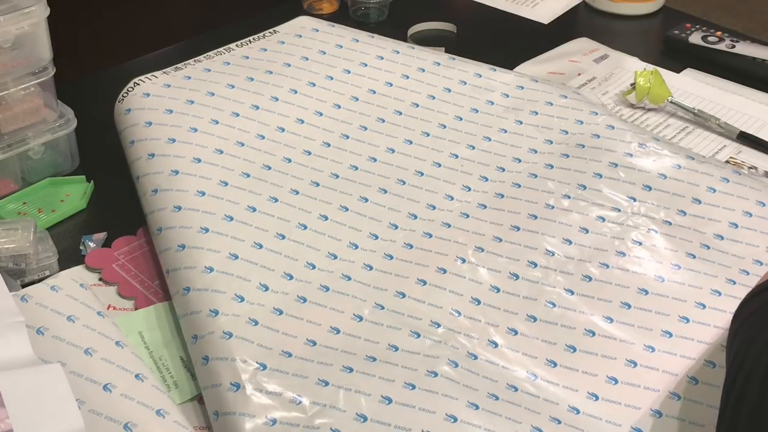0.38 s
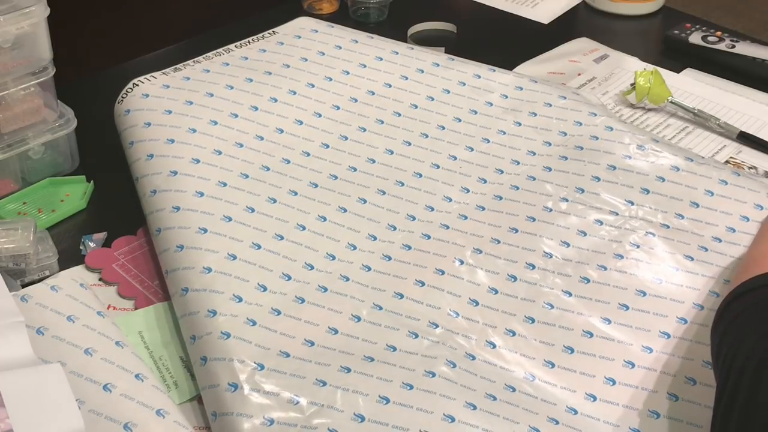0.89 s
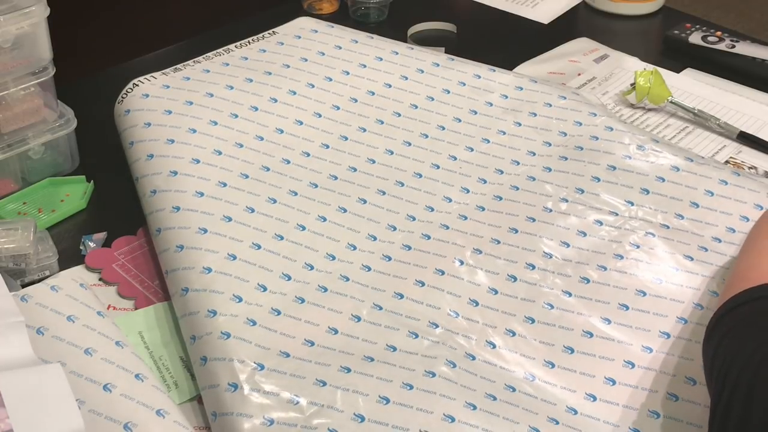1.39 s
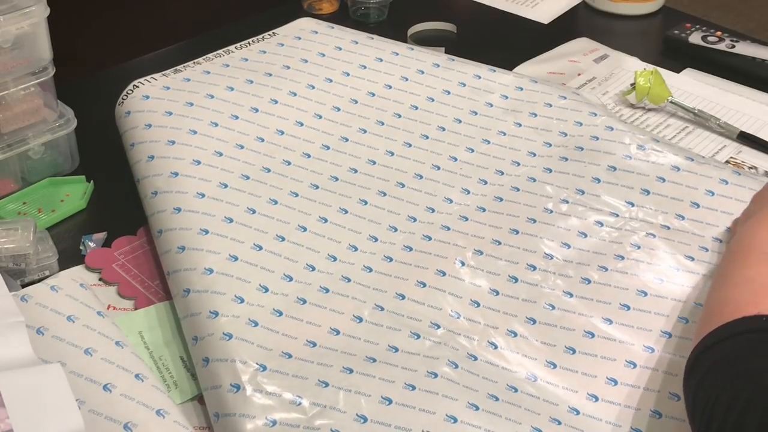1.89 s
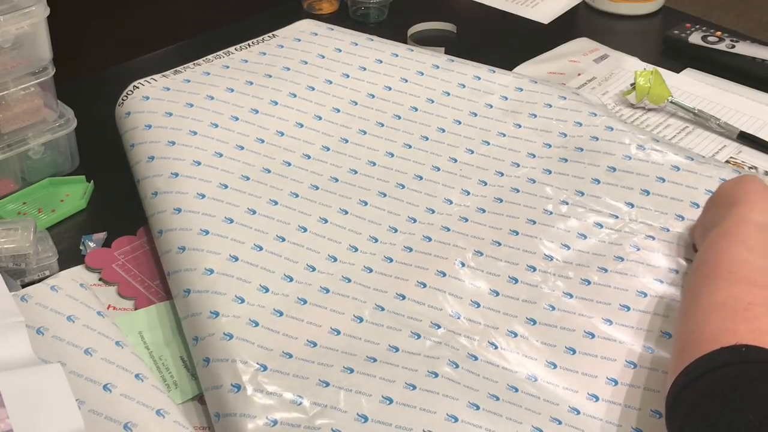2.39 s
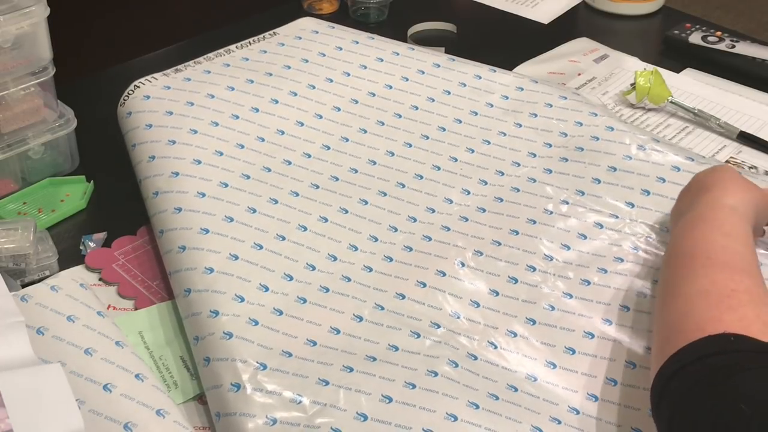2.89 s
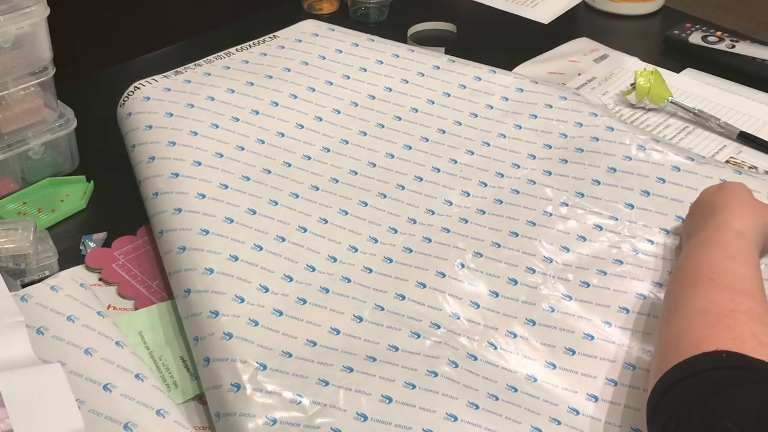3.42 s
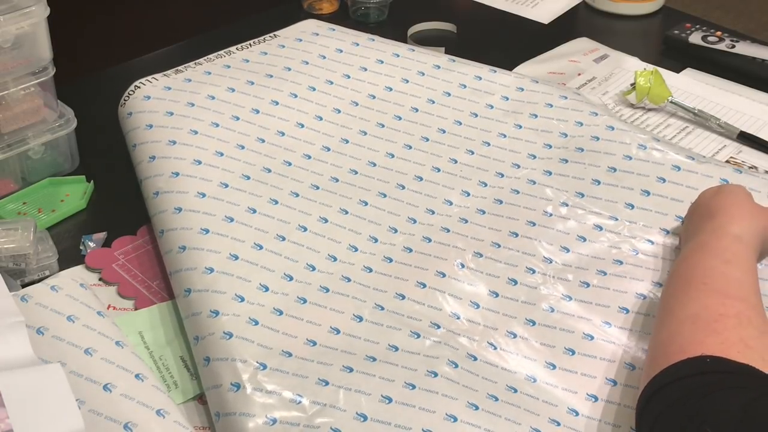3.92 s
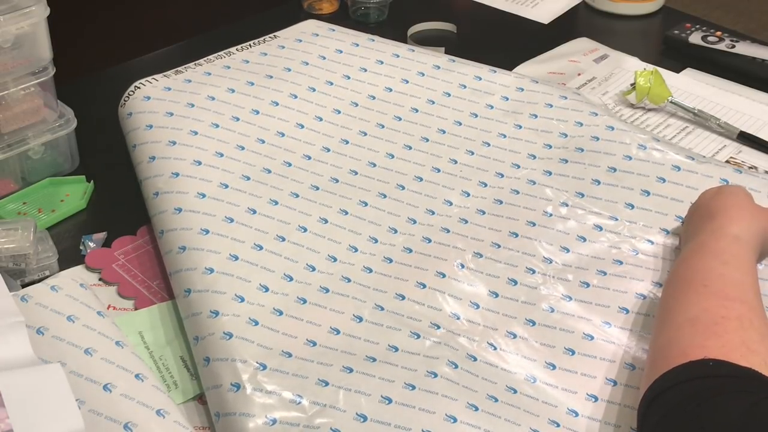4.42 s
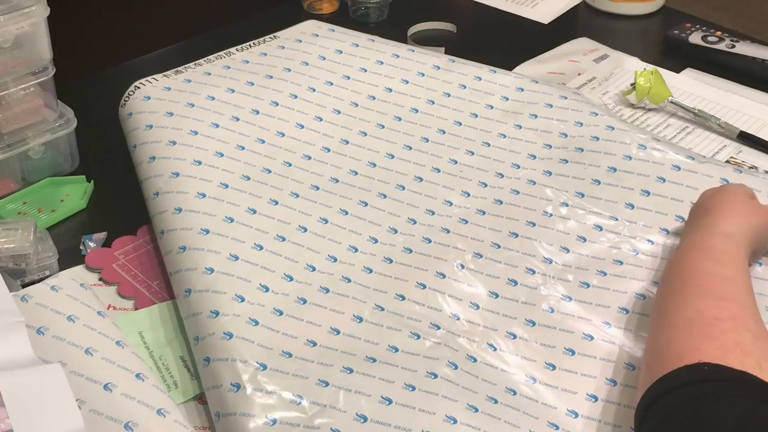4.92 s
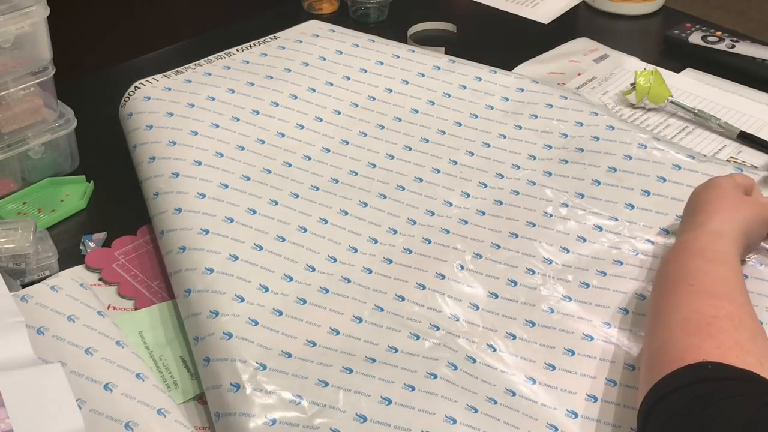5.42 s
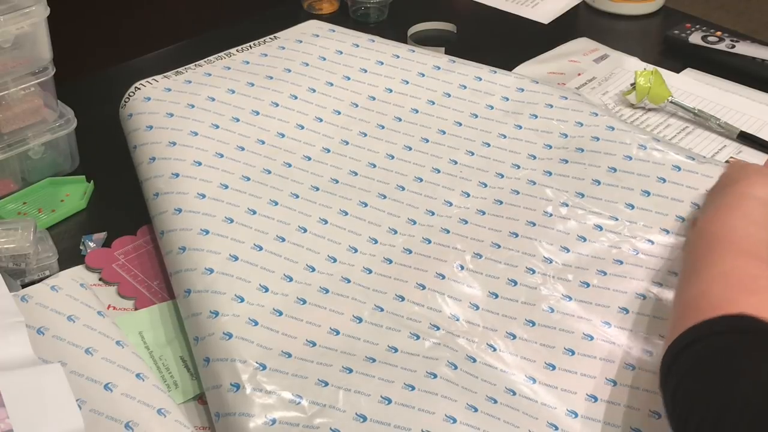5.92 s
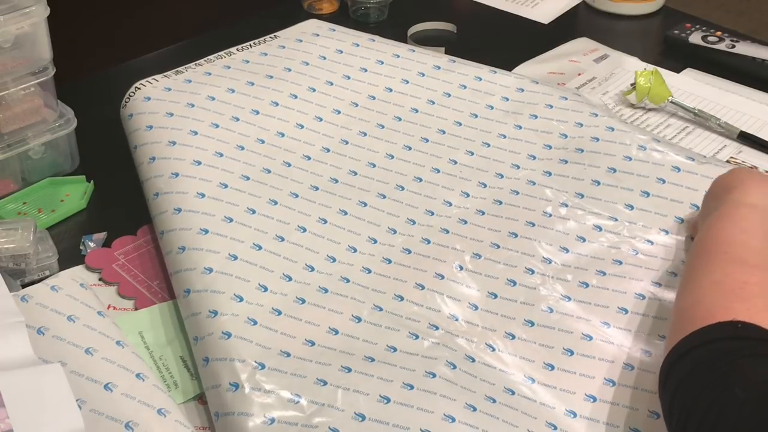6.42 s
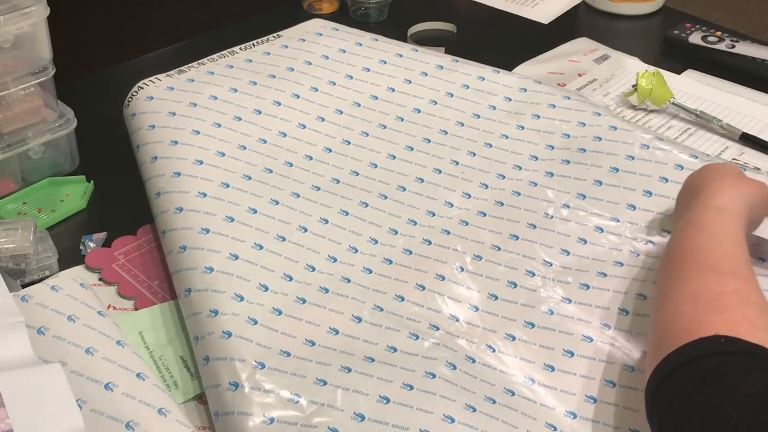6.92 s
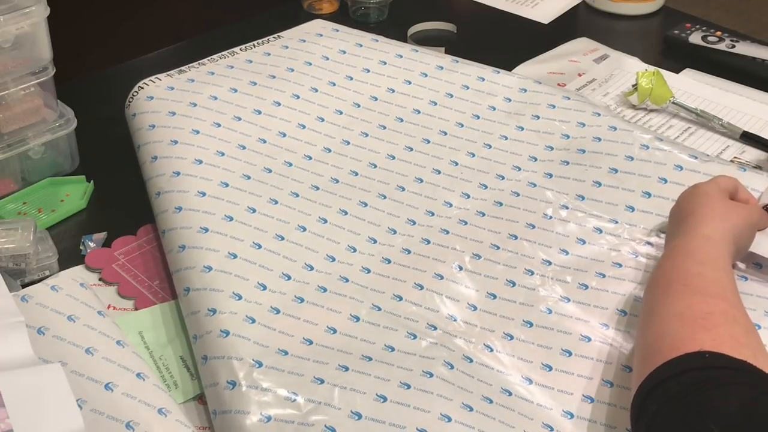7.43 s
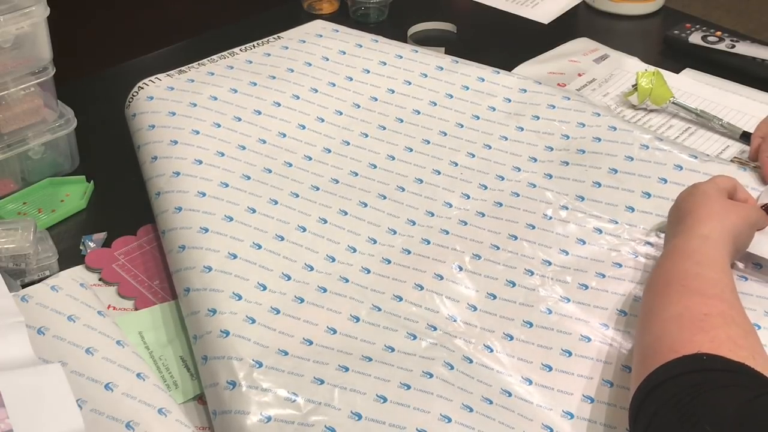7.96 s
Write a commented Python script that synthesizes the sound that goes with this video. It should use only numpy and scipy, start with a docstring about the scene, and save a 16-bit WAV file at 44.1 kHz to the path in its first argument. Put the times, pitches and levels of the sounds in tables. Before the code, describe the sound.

Close in a small room, a hand smooths stiff plastic film over a paper-backed sheet on a wooden table. Light ticks and a soft groan come first, then crackles swell near one and a half seconds, and sharper bursts follow around four and five. A resonant table groan sounds at six, then scattered snaps. Faint hum, thin whine and steady hiss stay underneath.

```python
"""A table groans and plastic crackles over a faint mains hum, a thin electronic whine and steady microphone hiss.
Stiff plastic film over a paper-backed canvas is smoothed by hand on a wooden table in a small room.
Each crease is a short noise burst that snaps and shivers; the sliding palm is shaped noise with tiny ticks.
The dragged roll sends noise through the table's resonances, and the leaning arm adds a low rumble.
Snaps and slides also get a short wash of echo from the walls."""
import sys
import numpy as np
from scipy import signal
from scipy.fft import rfft, irfft, next_fast_len
from scipy.io import wavfile
from scipy.ndimage import uniform_filter1d

SR = 44100
rng = np.random.default_rng(int(sys.argv[2]) if len(sys.argv) > 2 else 0)


def volts(x):
    """Linear amplitude factor 10**(x/20) for a level x in dB, scalar or array-like."""
    e = np.asarray(x, float) / 20
    return 10 ** e


def master_out(mix):
    """Clip the mix to full scale and print it as 16-bit PCM to the path in sys.argv[1]."""
    frames = np.transpose(np.atleast_2d(mix))
    ceiling = np.clip(frames, -1, 1)
    pcm = np.round(ceiling * 32767).astype(np.int16)
    wavfile.write(sys.argv[1], SR, pcm)


N = 355883  # length in samples
TIME_S = np.arange(N) / SR


def unit(x):
    """Scale to an rms (average strength) of 1."""
    return x / np.sqrt(np.mean(x ** 2))


def band(x, lo_hz, hi_hz):
    """Keep mainly the range between two frequencies, along the last axis."""
    sos = signal.butter(2, [lo_hz, min(hi_hz, 0.45 * SR)], "band", fs=SR, output="sos")
    return signal.sosfilt(sos, x)


def ring(x, hz, width_hz):
    """One resonance, with gain 1 at its centre."""
    return signal.lfilter(*signal.iirpeak(hz, hz / width_hz, fs=SR), x)


def colour(x, points):
    """Filter x with gains given as (Hz, dB) points, joined on a log frequency scale."""
    hz, db = np.transpose(points)
    size = next_fast_len(N)
    bin_hz = np.maximum(np.fft.rfftfreq(size, 1 / SR), 1)
    gain = volts(np.interp(np.log(bin_hz), np.log(hz), db))
    return irfft(rfft(x, size) * gain, size)[:N]


def walk(rate):
    """Random levels, each held 1 / rate seconds and smoothed twice; spread near 1."""
    hold = int(SR / rate)
    steps = np.repeat(rng.standard_normal(N // hold + 1), hold)
    return 1.3 * uniform_filter1d(uniform_filter1d(steps, hold), hold)[:N]


def grains(per_s, spread_db):
    """Sparse random clicks, most tiny and a few larger, scaled to rms 1."""
    size = volts(spread_db * np.minimum(rng.exponential(size=N), 3.5)) * rng.standard_normal(N)
    return unit(size * (rng.random(N) < per_s / SR))


def gesture(start, stop, start_db, stop_db, rise_s, fall_s):
    """Gain of one movement: swells in, drifts from one level to the other, dies away."""
    before_s = np.maximum(start - TIME_S, 0)
    after_s = np.maximum(TIME_S - stop, 0)
    edges = np.exp(-before_s / rise_s - after_s / fall_s)
    return edges * volts(np.interp(TIME_S, [start, stop], [start_db, stop_db]))


def snaps():
    """Each crease flips within a few milliseconds; its patch of film shivers in four ranges and favours one pitch."""
    # Creases snapping through. Each row: start in seconds, peak level in dB at the pivot before the
    # trims and ringing below, brightness in dB per octave, pitch of the patch in Hz.
    creases = [(0.138, -60, -3.5, 2700), (0.1525, -52, -0.5, 1700), (0.2203, -64, 11.5, 1300),
               (0.3983, -64, 13, 5500), (0.413, -52.5, 12.5, 7800), (0.426, -55, -1.9, 8900),
               (0.5584, -55.5, 3.5, 3100), (0.571, -56, -2, 2240), (0.6253, -62.5, 12.5, 2500),
               (0.785, -53, 10.5, 6440), (0.7947, -53, 11.5, 1400), (0.8605, -53.5, 12.5, 5800),
               (0.88, -65, 11, 1000), (0.89, -58, 10, 2900), (0.9046, -47.5, 9.5, 5800),
               (0.927, -47, 2.5, 1100), (1.0922, -50.5, 3.5, 6700), (1.277, -53, 5, 5800),
               (1.351, -48.5, 3, 3400), (1.394, -52, 7.5, 6300), (1.408, -42, 3, 5800),
               (1.4281, -40.5, 5.5, 3120), (1.4515, -40, 5, 5200), (1.4655, -39.5, 4, 2900),
               (1.4863, -39.5, 8, 1100), (1.4996, -35.5, 5.5, 5540), (1.504, -30, 0.5, 5640),
               (1.784, -56, 1, 6700), (1.8258, -47, 17, 6300), (2.035, -59.5, 2, 2920),
               (2.1303, -60, 2, 5800), (2.1531, -56.5, 1.4, 9500), (2.4008, -61, 5, 1000),
               (2.4614, -59, 13, 1000), (2.5416, -60, 8.6, 12500), (2.561, -64, 17, 10600),
               (2.5925, -61, 9.5, 6300), (2.6288, -53.5, 2, 5800), (2.6473, -46.5, 11.5, 7900),
               (2.6543, -43, 2.5, 2710), (2.6981, -47.5, 11, 7500), (2.7639, -37.5, 7.5, 5270),
               (3.0368, -53.5, 1.5, 1400), (3.494, -56, -0.2, 6300), (3.5335, -51, 3, 7400),
               (3.686, -55.5, 7.5, 5800), (3.734, -50, 10.5, 2700), (3.759, -40, 0, 2850),
               (3.7741, -56, 11, 1700), (3.791, -30.5, 2.5, 9300), (3.7988, -37, 6, 1100),
               (3.826, -37.5, 0, 2390), (3.833, -37, 6, 2400), (3.8406, -30.5, 4, 2180),
               (3.8458, -34.5, 8, 1500), (3.8485, -31.5, 6.5, 8600), (3.8595, -35.5, 9.5, 2930),
               (3.8661, -34.5, 5.5, 3050), (4.5238, -53.5, 1.5, 1390), (4.5518, -32.5, 3.5, 6200),
               (4.5772, -37, 1, 1900), (4.586, -40.5, -9.5, 5800), (4.5903, -21.5, 3, 5800),
               (4.6197, -32.5, 7, 6240), (4.6433, -27.5, 2, 3200), (4.663, -30.5, 4.5, 2950),
               (4.679, -44.5, 6.5, 3900), (4.7111, -33, 1.5, 2400), (4.7145, -33.5, 0.5, 5800),
               (4.8356, -48, -0.2, 5800), (4.8634, -39, -1.5, 2570), (4.8722, -37.5, 3, 1180),
               (4.8783, -34.5, 5, 6200), (4.8906, -35.5, 3, 4400), (4.9417, -37.5, 7.5, 5800),
               (4.9648, -34.5, 1.5, 6400), (5.1326, -31, 0, 2380), (5.275, -55, -2, 1400),
               (5.3276, -49, 9.5, 2900), (5.3616, -48.5, 1, 6340), (5.377, -52.5, -4, 2400),
               (5.442, -46.5, 2.5, 1920), (5.5373, -53.5, -4, 6760), (5.624, -57.5, 0, 6200),
               (5.6446, -56, -0.5, 7600), (5.791, -58, -4.4, 1300), (5.8355, -43.5, 1, 2150),
               (6.0884, -52, 2, 1000), (6.1195, -28.5, 0.5, 5800), (6.2213, -58.5, -9.5, 2920),
               (6.457, -54, 1, 1290), (6.5353, -63, 5, 7200), (6.5613, -42.5, 6.5, 5800),
               (6.5802, -47.5, 6.5, 1400), (6.5827, -52, 13.5, 1280), (6.6795, -47, 6, 1400),
               (6.9361, -53.5, 6.5, 6220), (6.9421, -51, -2.1, 2900), (6.9591, -36, 10, 2880),
               (6.9789, -31.5, 3, 1380), (7.0139, -37.5, -1, 5800), (7.488, -54, -2.2, 2900),
               (7.688, -61.5, 3.5, 9500), (7.863, -51.5, 9, 1410), (7.9205, -45, 8.5, 2830),
               (7.9981, -56, 1, 8800)]
    # Four ranges of the film: body, face, crisp, edge. Each row: low end in Hz, high end in Hz,
    # shiver level in dB against the flip, time for the shiver to die down in seconds.
    film = [(725, 2440, 1, 0.0038), (2450, 5430, -3, 0.006), (5460, 7950, -35, 0.0014),
            (8520, 14800, -13.5, 0.0038)]
    # Trim of each range, the same for every snap. One value per range, in dB.
    range_trim_db = (-0.75, -0.53, -0.58, 1)
    pivot_hz = 4000  # brightness tilts around this frequency
    patches = 8  # places on the sheet, each with its own path to the walls
    patch_ring_db, patch_ring_width = 3, 0.18  # level of the added ringing; width as a share of its pitch

    start_s, peak_db, tilt_db, pitch_hz = np.transpose(creases)[:, :, None]
    t = np.arange(2048) / SR
    shake = rng.standard_normal((len(creases), len(t)))
    crack = 0
    for trim_db, (lo_hz, hi_hz, shiver_db, shiver_s) in zip(range_trim_db, film):
        # the higher the range, the shorter the flip
        flip = np.minimum(t / 0.0001, 1) * np.exp(-t * np.sqrt(lo_hz) / 0.058)
        shiver = volts(shiver_db) * np.exp(-t / shiver_s)
        part = band(band(shake * (flip + shiver), lo_hz, hi_hz), lo_hz, hi_hz)
        # bring the top of each burst's outline to 1
        part = part / np.abs(signal.hilbert(part)).max(axis=1, keepdims=True)
        octaves = np.log2(np.sqrt(lo_hz * hi_hz) / pivot_hz)
        crack = crack + volts(peak_db + tilt_db * octaves + trim_db) * part
    rung = np.array([ring(c, hz, hz * patch_ring_width) for c, hz in zip(crack, pitch_hz[:, 0])])
    out = np.zeros((patches, N + len(t)))
    patch = np.arange(len(creases))[:, None] % patches  # the snaps take the patches in turn
    sample = (start_s * SR).astype(int) + np.arange(len(t))
    np.add.at(out, (patch, sample), crack + volts(patch_ring_db) * rung)
    return out[:, :N]


def slide():
    """Skin on film hisses and sets off tiny bright ticks; the paper backing crumples lower down."""
    # Balance of the hiss. Each row: frequency in Hz, relative level in dB.
    hiss_colour = [(1470, -91), (2500, -3), (6600, -1), (15100, -6.5), (16100, -11), (16500, -78)]
    # Palm strokes over the film. Each row: start in seconds, stop in seconds, hiss level in dB
    # at the start, hiss level in dB at the stop, paper rustle in dB over the hiss.
    strokes = [(0.15, 0.286, -76, -90, 6.5), (0.423, 0.523, -65.5, -74, 0), (0.557, 0.68, -67, -82, -10),
               (0.84, 1.467, -70.5, -60, -10), (1.487, 1.902, -70, -67.5, -5), (2.09, 2.203, -86, -90, 3),
               (2.454, 2.607, -95, -77, -7), (2.647, 3.042, -68, -69.5, -3), (3.5, 3.74, -98, -71, -9),
               (3.74, 3.875, -64.5, -43.5, 1), (4.555, 4.756, -55, -61, -3), (4.856, 5.013, -57, -67.5, 0),
               (5.147, 5.266, -65.5, -78, -7), (5.296, 5.61, -67, -82, 0.5),
               (5.796, 5.843, -71.5, -64.5, -10), (6.089, 6.233, -63, -85, 1), (6.26, 6.362, -71, -77, -10),
               (6.546, 6.742, -81, -78, -1.5), (6.908, 7.016, -77, -54.5, -3.5),
               (7.242, 7.342, -70, -57.5, -5), (7.52, 7.65, -70, -75, -16), (7.79, 7.873, -86.5, -85.5, 19)]
    rise_s, fall_s = 0.0059, 0.0052  # time constants of a stroke
    resting = volts(-76.5)  # the resting hand, always there

    grip, crumple = volts(1.5 * walk(30)), volts(2.5 * walk(45))
    ticks = unit(band(band(grains(110, 5.0), 4800, 14000), 4800, 14000))
    hiss = unit(colour(rng.standard_normal(N) * grip, hiss_colour)) + 0.4 * ticks
    paper = rng.standard_normal(N) * crumple + 0.4 * grains(500, 2.0)
    rustle = unit(band(band(paper, 250, 4680), 340, 2780))
    rub = np.array([gesture(*row[:-1], rise_s, fall_s) for row in strokes])
    bend = volts(np.array(strokes)[:, -1]) @ rub
    return hiss * (rub.sum(axis=0) + resting) + rustle * (bend + resting)


def table():
    """The dragged roll's stick-slip scuffs and rings the table top; the leaning arm rumbles through it."""
    # Resonances of the table top. Each row: frequency in Hz, width in Hz, relative level in dB.
    modes = [(256, 540, -27), (339.6, 43, -6), (390, 33, 2.5), (468, 37, -3.5), (553, 23, -15),
             (695, 59, -14), (963, 55, -16)]
    # Roll dragging over the table top. Each row: start in seconds, stop in seconds, groan level
    # in dB at the start, groan level in dB at the stop, scuff in dB over the groan.
    drags = [(0.086, 0.22, -60, -58.5, -4.5), (0.629, 0.8, -67, -73, 1), (0.926, 1.902, -83, -81.5, 12.5),
             (2.65, 3.053, -87.5, -83.5, 15.5), (3.201, 3.2, -80, -68, 17),
             (5.976, 6.098, -46.5, -42.5, -19), (6.112, 6.367, -46.5, -75, -25)]
    # Arm weight shifting on the table. Each row: start in seconds, stop in seconds,
    # rumble level in dB at the start, rumble level in dB at the stop, both added to the resting rumble.
    leans = [(0.127, 0.174, -61, -61), (0.593, 0.742, -66.5, -61.5), (0.963, 1.938, -70.5, -69),
             (2.697, 3.25, -79, -77), (3.783, 3.862, -56, -53), (4.717, 4.755, -72, -60),
             (6.022, 6.145, -59, -63)]
    drag_rise_s, drag_fall_s = 0.002, 0.014  # time constants
    lean_rise_s, lean_fall_s, lean_rest_db = 0.013, 0.028, -72.5

    def resonate(force):
        # each mode twice over keeps the valleys between them dark
        return sum(volts(db) * ring(ring(force, hz, width_hz), hz, width_hz) for hz, width_hz, db in modes)

    slip = rng.standard_normal(N)
    push = np.array([gesture(*row[:-1], drag_rise_s, drag_fall_s) for row in drags])
    steady = resonate(slip)  # unheard; sets the groan's scale
    groan = resonate(slip * push.sum(axis=0)) / np.std(steady)
    scuff = unit(band(slip, 140, 550)) * (volts(np.array(drags)[:, -1]) @ push)
    rumble = unit(band(band(rng.standard_normal(N), 40, 145), 40, 140))
    weight = volts(lean_rest_db) + sum(gesture(*row, lean_rise_s, lean_fall_s) for row in leans)
    return groan + scuff + rumble * weight


def echo(x):
    """The walls return a decaying wash of noise, with its own fading time in each frequency band."""
    # Wash from the walls. Each row: middle of the band in Hz, time to fade by 60 dB in seconds, level in dB.
    wash_bands = [(1000, 0.17, -13.5), (2645, 0.33, -15), (5800, 0.27, -14.5), (11300, 0.12, -9)]
    t = np.arange(SR // 2) / SR
    wash = 0
    for hz, t60_s, db in wash_bands:
        tail = band(rng.standard_normal(len(t)), hz / 1.79, hz * 1.574)
        tail = tail * 1000 ** (-t / t60_s) * np.minimum(t / 0.00099, 1)
        wash = wash + volts(db) * tail / np.sqrt(np.sum(tail ** 2))
    return x + signal.fftconvolve(x, wash)[:N]


def room_tone():
    """Steady noise hiss, a mains hum wavering in level, and a whine made of very narrow noise."""
    # Balance of the steady hiss. Each row: frequency in Hz, relative level in dB.
    hiss_points = [(12, -41), (20, -9.5), (124, -12), (218, -7.5), (351, -10), (506, -17.5), (652, -14.5),
                   (750, -25), (9670, -51), (16500, -44)]
    # Hum first, then whine. Each row: frequency in Hz, rms level in dB (the hum wavers around its level).
    tones = [(120, -71.5), (9400, -84)]
    hiss = colour(rng.standard_normal(N), hiss_points)
    hiss = hiss * volts(-74) / np.std(band(hiss, 200, 16000))  # -74 dB rms in this range
    (hum_hz, hum_db), (whine_hz, whine_db) = tones
    waver_db = 1.3 * walk(10)
    hum = np.sqrt(2) * volts(hum_db + waver_db) * np.sin(2 * np.pi * hum_hz * TIME_S)
    whine = volts(whine_db) * unit(ring(rng.standard_normal(N), whine_hz, 110))
    return hiss + hum + whine


def scene():
    """Everything at the table, added together; each patch of film has its own echo."""
    film = sum(echo(patch) for patch in snaps())
    return (film + echo(slide()) + table() + room_tone())[None]


def roll_off(x):
    """The treble ends steeply here."""
    return signal.sosfilt(signal.butter(12, 16990, fs=SR, output="sos"), x)


def record(dry):
    """The microphone housing partly cancels three treble bands."""
    # Weakened bands. Each row: middle in Hz, width in Hz, share cancelled from 0 to 1.
    housing = [(4850, 190, 0.4), (7570, 1100, 0.41), (10400, 1200, 0.4)]
    heard = dry - sum(share * ring(dry, hz, width_hz) for hz, width_hz, share in housing)
    return roll_off(heard)


dry = scene()
out = record(dry)
master_out(out)
```